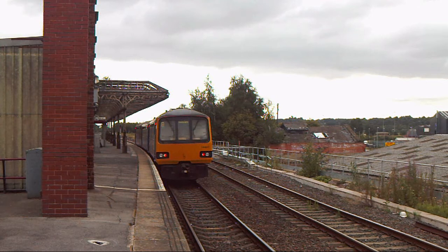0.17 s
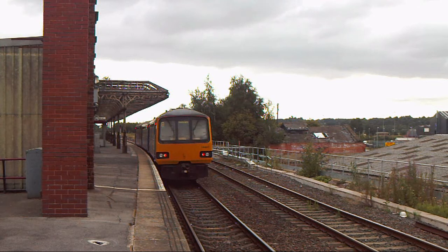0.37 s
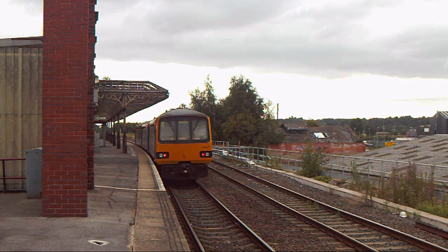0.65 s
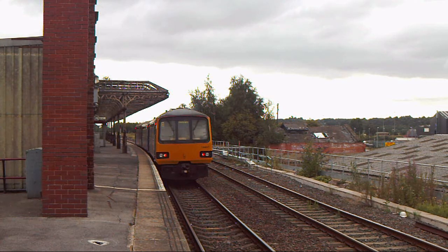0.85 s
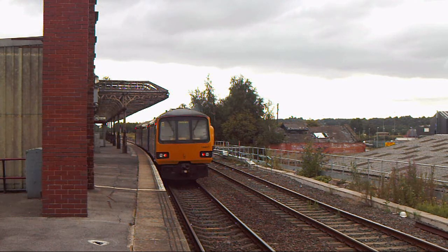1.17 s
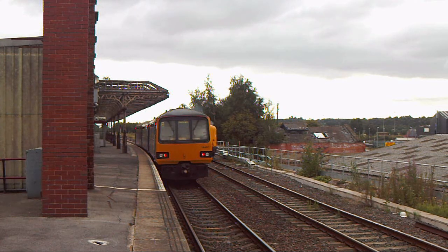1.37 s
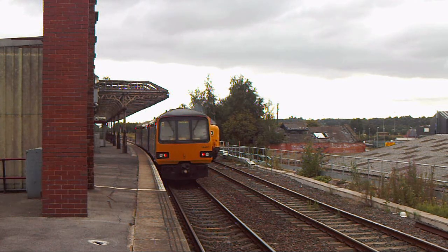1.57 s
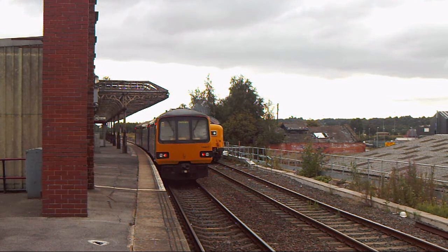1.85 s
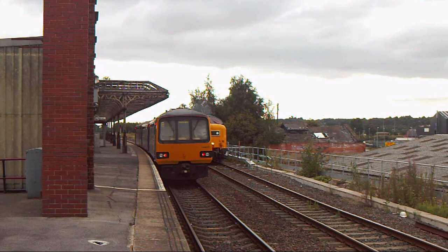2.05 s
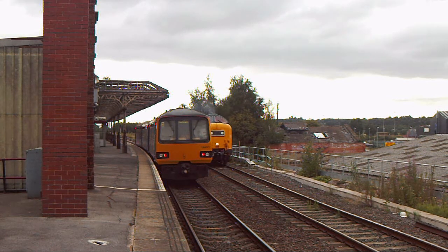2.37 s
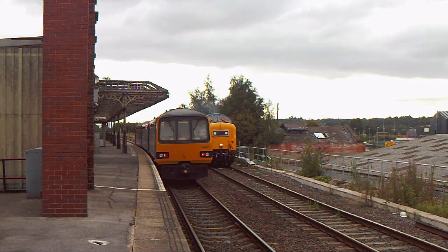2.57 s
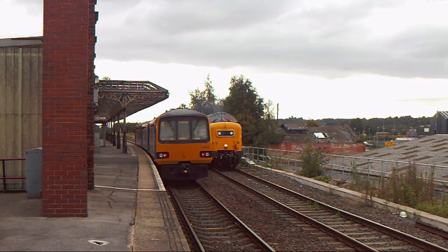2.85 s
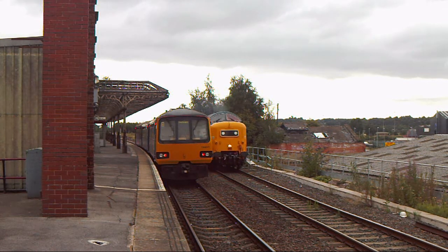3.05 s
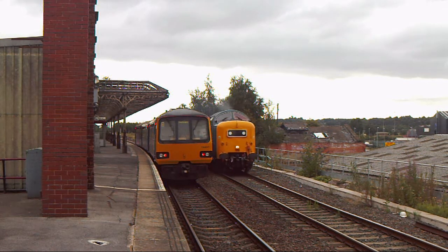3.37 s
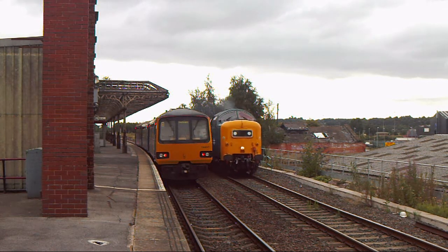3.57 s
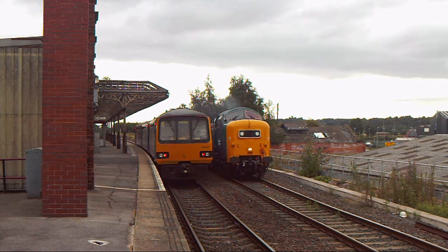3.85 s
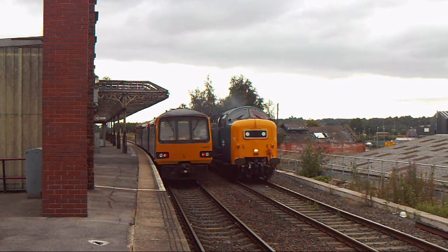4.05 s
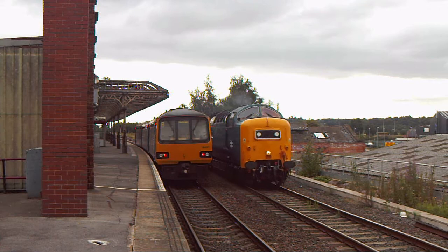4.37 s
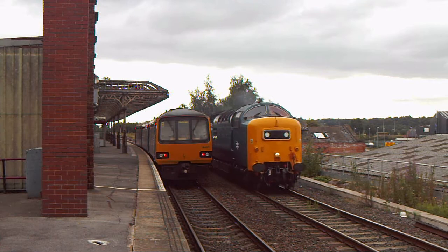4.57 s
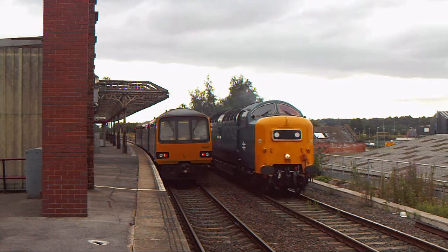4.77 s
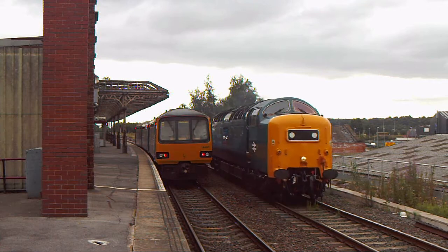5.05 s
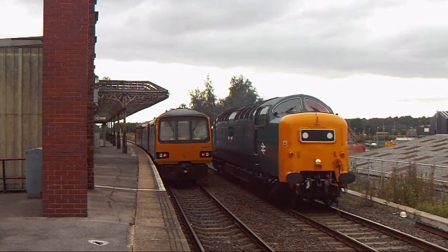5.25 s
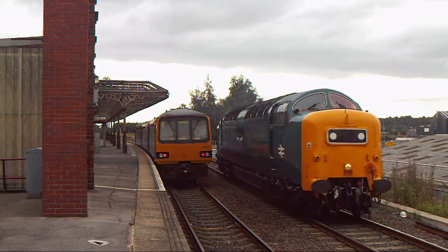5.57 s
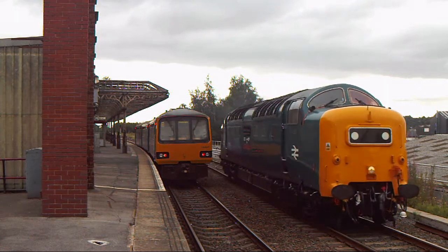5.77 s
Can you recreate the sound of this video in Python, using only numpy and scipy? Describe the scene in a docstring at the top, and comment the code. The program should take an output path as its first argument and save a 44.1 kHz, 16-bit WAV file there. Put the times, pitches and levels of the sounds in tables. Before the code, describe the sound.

A deep, buzzing diesel drone with a rapid throb, about fourteen pulses a second, wavers unsteadily and sinks slightly in pitch. Low rumble and a railcar's idling hum lie beneath. From mid-clip the exhaust roar and mechanical clatter open up and build strongly, with short rail-joint clanks on the way. Open-air platform, camcorder microphone with light hiss and a barely audible high whistle; the engine never fades away.

```python
"""Diesel locomotive nearing a platform

A two-stroke diesel locomotive runs towards a camcorder on the platform, past an idling railcar.
Its exhaust is a set of tones locked to the shaft: nine firings a turn and a throb once a turn.
Shaped noise makes the gas roar and engine clatter, which grow as it nears, and the low rumble; noise bursts
are wheels on a rail joint. The railcar hums and whines. Under it all lie a steady faint hiss,
noise that scales with the sound's momentary size, and a thin whistle."""
import sys
import numpy as np
from scipy import signal
from scipy.fft import rfft, irfft
from scipy.io import wavfile
from scipy.ndimage import uniform_filter1d

SR = 44100
rng = np.random.default_rng(int(sys.argv[2]) if len(sys.argv) > 2 else 0)


def bounce(signal):
    """Save signal as a 16-bit WAV file at the path given by the first command-line argument."""
    frames = np.transpose(np.atleast_2d(signal))
    limited = np.clip(frames, -1, 1)
    pcm = np.round(limited * 32767).astype(np.int16)
    wavfile.write(sys.argv[1], SR, pcm)


N = 260631
TIME = np.arange(N) / SR  # seconds


def undb(db):
    """Decibels to gain."""
    return 10 ** (np.asarray(db) / 20)


def unit(x):
    """Scale to rms 1."""
    return x / np.sqrt(np.mean(x ** 2))


def envelope(points):
    """Straight lines through (time, level) points, sample by sample."""
    s, level = np.transpose(points)
    return np.interp(TIME, s, level)


def colour(x, spectrum):
    """Shape a sound by (Hz, dB) points, falling away beyond both ends; rms 1."""
    hz, db = np.transpose(spectrum)
    f = np.maximum(np.arange(N // 2 + 1) * SR / N, 1)
    gain = undb(np.interp(np.log(f), np.log(hz), db))
    low_edge = np.minimum(f / hz[0], 1) ** 2
    high_edge = np.minimum(hz[-1] / f, 1) ** 2
    return unit(irfft(rfft(x) * gain * low_edge * high_edge, N))


def noise():
    """White noise."""
    return rng.standard_normal(N)


def walk(rate):
    """Smooth random wandering of rms 1 with rate knots a second; it holds its value after 1024 knots."""
    knots = rng.standard_normal(1024)
    path = np.interp(TIME * rate, np.arange(len(knots)), knots)
    return unit(uniform_filter1d(path, max(int(SR / rate / 2), 1)))


def gate(turns, depth):
    """A swell once a cycle."""
    return np.exp(depth * np.cos(2 * np.pi * turns))


def partial(turns, wander, rate):
    """A tone of rms near 1 whose strength and phase waver."""
    waver = 1 + wander * (walk(rate) + 1j * walk(rate))
    tone = np.real(np.exp(2j * np.pi * turns) * waver)
    return np.sqrt(2) * tone / np.sqrt(1 + 2 * wander ** 2)


def locomotive():
    """Exhaust tones, gas puffs and mechanical clatter, all timed by the one shaft, over a low rumble."""
    turns = shaft_turns()
    return exhaust(turns) + gas_roar(turns) + engine_clatter(turns) + low_rumble()


def shaft_turns():
    """Turns of the engine shaft as its heard speed eases down along an S-curve."""
    fast_hz, slow_hz = 14.411, 13.4854  # turns per second that the curve runs between
    middle_s, ease_s = 2.351, .924  # middle and time constant of the curve
    shaft_hz = slow_hz + (fast_hz - slow_hz) / (1 + np.exp((TIME - middle_s) / ease_s))
    start_turn = .15
    return np.cumsum(shaft_hz) / SR + start_turn


def approach(db, shadow_db, emerges, spread):
    """Gain rises as the distance shrinks (spread 1 = as 1 / distance) and the railcar stops screening.

    db is the level in the open at the reference distance, shadow_db the loss when fully screened,
    emerges the times in seconds when a part starts to come out and when it is in the open.
    """
    speed_m_s, track_m, reference_m = 14, 8, 28
    passes_s = 7.8  # when it would draw level with the listener, after the sound ends
    distance = np.hypot(speed_m_s * (passes_s - TIME), track_m)
    hidden = np.interp(TIME, emerges, [1, 0])
    return undb(db - shadow_db * hidden) * (reference_m / distance) ** spread


def exhaust(turns):
    """The firing note and further shaft orders, which add up to one throb a turn."""
    # firing note, swelling and fading on its way; trimmed below: t/s, level/dB
    note_level = [(0, -48), (0.15, -23), (0.36, -28.7), (0.47, -23.5), (0.7, -27), (1.1, -26), (2.15, -29),
                  (2.3, -25), (3.2, -24), (3.95, -32.5), (4.38, -20.5), (4.85, -13.5), (5.5, -11.5),
                  (5.91, -19.0)]
    # the overtones together, trimmed below: t/s, level/dB
    overtone_level = [(0, -35.5), (0.5, -41), (0.9, -35), (1.3, -40.0), (2.6, -35.5), (3.6, -36),
                      (4.3, -32.5), (5.0, -27), (5.91, -17)]
    # further shaft orders, including the firing note's octave (18) and third harmonic (27):
    # order [per turn], level/dB re the overtones' level
    orders = [(2, -24), (5, -9), (7, -1), (10, -2), (11, -7), (14, -13), (16, -12.5), (17, -0.5),
              (18, -3.5), (19, -13.5), (21, -15.5), (25, -9.5), (27, -15.5), (42, -22.5)]

    # the tones waver as the air and the reflections change
    note = partial(9 * turns, wander=.04, rate=20)
    beat = partial(8 * turns, wander=.07, rate=8)  # one order below, so it beats with the note once a turn
    beat_gain = approach(-14.5, shadow_db=14, emerges=(1.5, 5.3), spread=1.63)
    overtones = 0
    for order, db in orders:
        # away from the pipe's resonance the orders lag by part of a cycle, which rounds the throb
        lag = .3 * (abs(order - 9) > 1.5)
        # higher orders waver more on their way
        tone = partial(round(order) * turns - lag, wander=0.025 * order, rate=5)
        overtones = overtones + undb(db) * tone
    note_gain = undb(envelope(note_level) + 1.37)
    overtone_gain = undb(envelope(overtone_level) - 4.5)
    return note_gain * note + beat_gain * beat + overtone_gain * overtones


def gas_roar(turns):
    """Turbulent gas leaves the stacks in a puff at each firing, strongest once a turn."""
    # tone colour of the gas: f/Hz, relative level/dB
    gas_colour = [(90, 5.5), (140, 10), (185, 4.5), (280, -2), (335, 4), (400, -2), (480, -6), (600, -6),
                  (720, -16), (1000, -18), (1550, -18.5), (2100, -33)]
    puffs = gate(turns, depth=.24) * gate(9 * turns, depth=.6)
    gain = approach(-23, shadow_db=11.5, emerges=(1.0, 4.2), spread=1.38)
    return gain * colour(noise() * puffs, gas_colour)


def engine_clatter(turns):
    """Noise of casing, fans and wheels, pulsing slightly at each firing and fluttering at random."""
    # tone colour of the casing, fans and wheels: f/Hz, relative level/dB
    clatter_colour = [(450, 2), (800, 10), (940, -23), (1060, -6), (1280, -6.5), (1550, 7), (1850, -7.5),
                      (2200, 6), (2700, 5), (3500, -8), (4000, -3.5), (4700, -8.5), (6500, -12.5),
                      (11000, -33)]
    flutter = undb(0.89 * walk(16))
    gain = approach(-39.5, shadow_db=2.5, emerges=(2.0, 2.6), spread=1.0)
    return gain * colour(noise() * gate(9 * turns, depth=0.077) * flutter, clatter_colour)


def low_rumble():
    """Low noise of the train and the air, rising and sinking."""
    # tone colour of the rumble: f/Hz, relative level/dB
    rumble_colour = [(6, 1), (20, 5.5), (35, -2), (60, 3.5), (85, -4), (130, 3), (200, -20), (400, -23.5)]
    # its course, trimmed below: t/s, level/dB
    rumble_level = [(0, -30), (0.3, -26.6), (0.9, -30), (1.6, -28), (2.3, -28), (3.2, -26.5), (3.6, -31),
                    (4.4, -26.5), (5.91, -23)]
    return undb(envelope(rumble_level) - 2.0) * colour(noise(), rumble_colour)


def rail_joint():
    """Each wheel strikes the gap: a burst of coloured noise with a sharp onset and a short ring."""
    # wheel blows, trimmed below: t/s, level/dB, decay/s
    clanks = [(4.183, -37, 0.04), (4.397, -37.5, 0.014), (4.42, -47, 0.011), (4.634, -39.5, .022)]
    # what wheel and rail ring with: f/Hz, relative level/dB
    wheel_colour = [(500, -18), (1400, 5), (2300, 9.5), (3000, 8.5), (3600, -0.5), (4300, 2.5), (7000, -7),
                    (9500, -26)]
    blows = 0
    for s, db, decay in clanks:
        age = np.maximum(TIME - s, 0)
        onset = 1 - np.exp(-age / 0.0012)
        tail = .3 * np.exp(-age / .06)
        blows = blows + undb(db + 0.5) * onset * (np.exp(-age / decay) + tail)
    # this wander has come to rest before the first blow, so it only shifts the blows' common level
    level_shift = undb(1.5 * walk(300))
    return blows * colour(noise() * level_shift, wheel_colour)


def railcar():
    """A diesel at tick-over: a low firing hum, fluttering casing noise and wavering whines."""
    # harmonics of the firing hum: harmonic number, relative level/dB
    hum_harmonics = [(1, 1.5), (2, -10), (3, -17)]
    # tone colour of the casing: f/Hz, relative level/dB
    casing_colour = [(120, -9.5), (200, -5), (350, -9.5), (430, -6.5), (540, 3.5), (730, -4), (850, -4.5),
                     (960, -10), (1130, -5.5), (1350, -12.5), (1550, -14), (1900, -19), (4500, -26),
                     (9000, -32.5)]
    # fan and gear whines, level between swells: f/Hz, level/dB
    whine_tones = [(372, -57), (545, -52), (630, -58), (805, -54), (882, -59.5), (1051, -57.5), (1147, -58)]
    # swells of casing noise and whines: t/s, rise/dB, width/s
    swells = [(.8, 0.9, .2), (2.0, 2, 0.2), (3.8, 2.5, 0.29)]

    idle_hz = 39.3  # steady firing rate
    swell_db = sum(db * np.exp(-((TIME - s) / width) ** 2) for s, db, width in swells)
    hum = sum(undb(db) * partial(round(k) * idle_hz * TIME, wander=0.067, rate=2.61)
              for k, db in hum_harmonics)
    casing = colour(noise() * undb(0.8 * walk(30)), casing_colour)
    whines = sum(undb(db) * partial(hz * TIME, wander=1.0, rate=20) for hz, db in whine_tones)
    return undb(-38.5) * hum + undb(-41.5 + swell_db) * casing + undb(swell_db) * whines


def scene():
    """Everything as it reaches the platform."""
    return (locomotive() + rail_joint() + railcar())[None]


def record(dry):
    """A steady faint hiss, noise that scales with the sound's momentary size, a faint whistle and a cut top."""
    steady_hiss = undb(-52.5) * noise()
    size_noise = undb(-37.7) * np.abs(dry) * noise()
    whistle_hz, top_hz = 15734, 15800
    whistle = undb(-62.0) * partial(whistle_hz * TIME, wander=.4, rate=100)
    low_pass = signal.ellip(12, .2, 80, top_hz, fs=SR, output="sos")
    return signal.sosfilt(low_pass, dry + steady_hiss + size_noise + whistle)


dry = scene()
out = record(dry)
bounce(out)
```